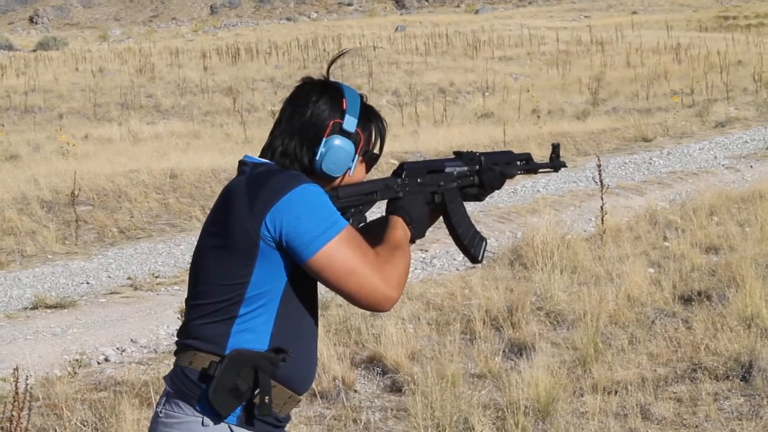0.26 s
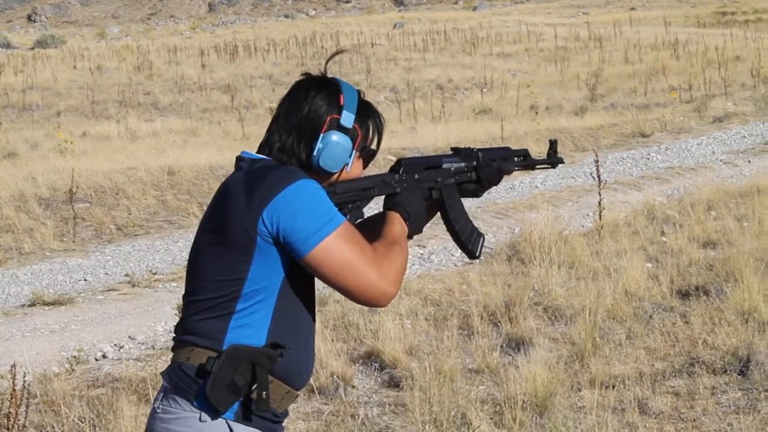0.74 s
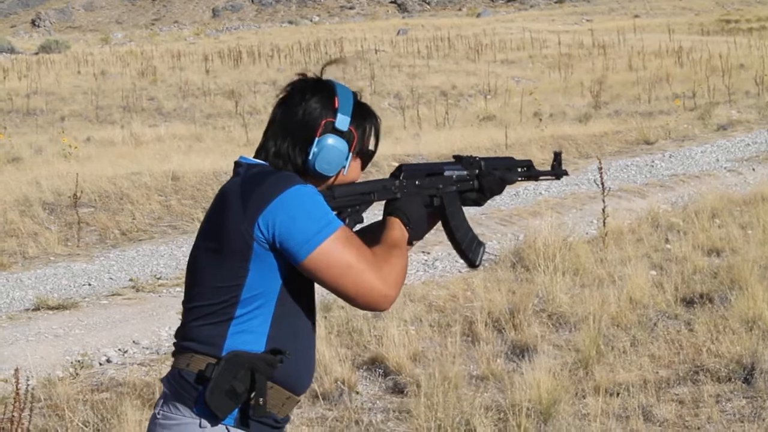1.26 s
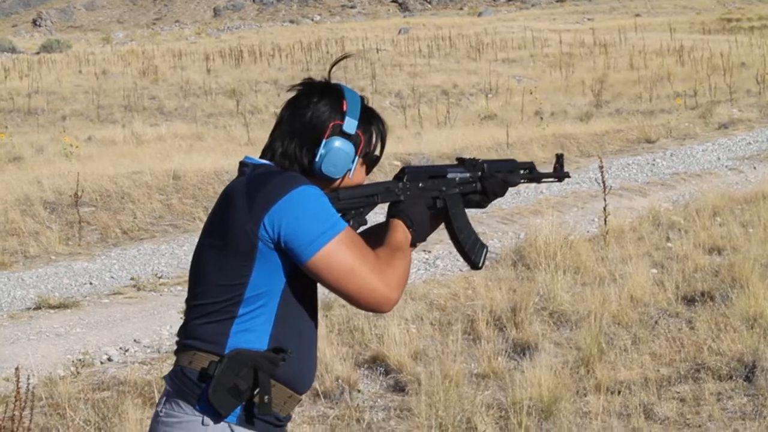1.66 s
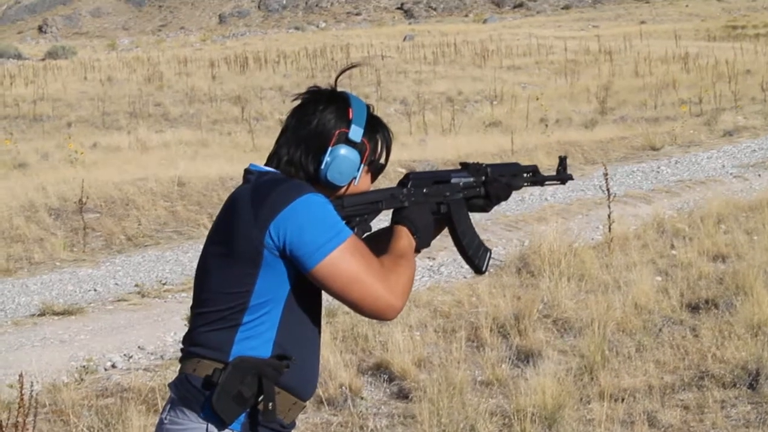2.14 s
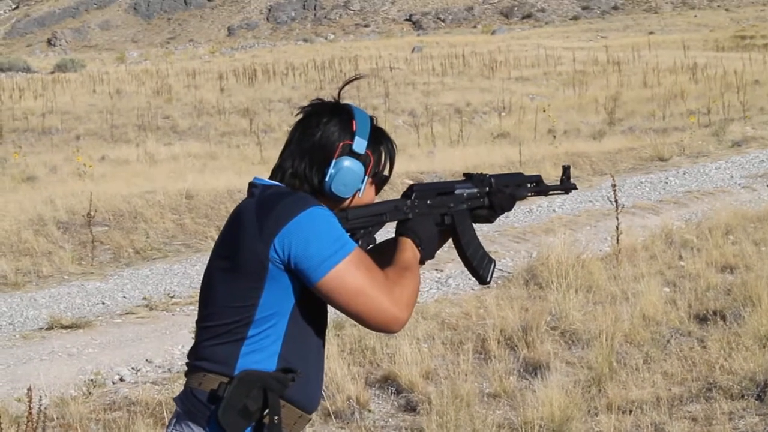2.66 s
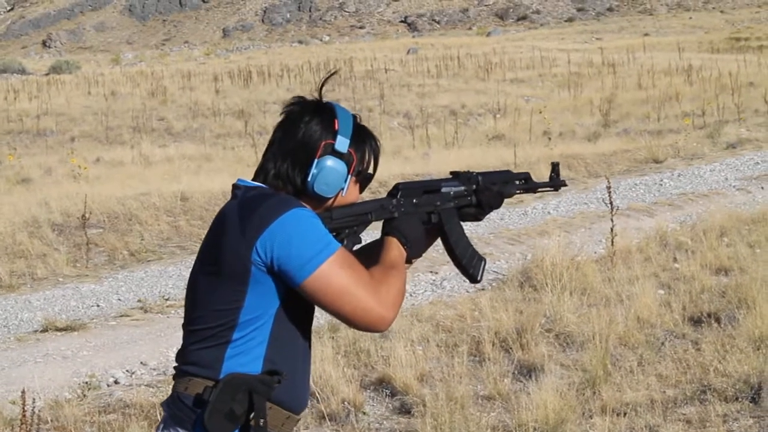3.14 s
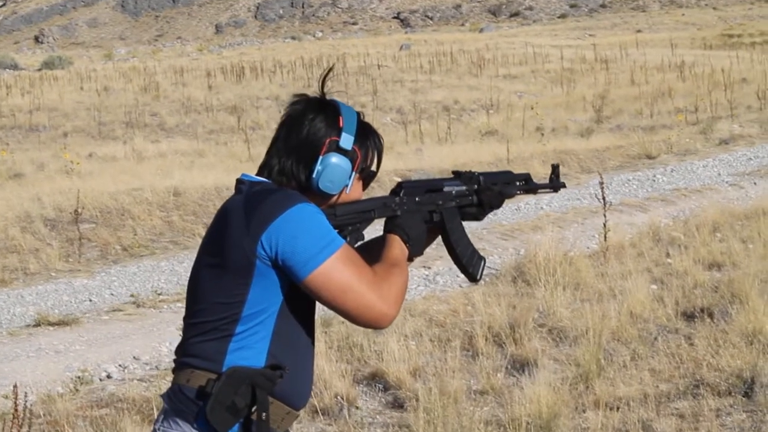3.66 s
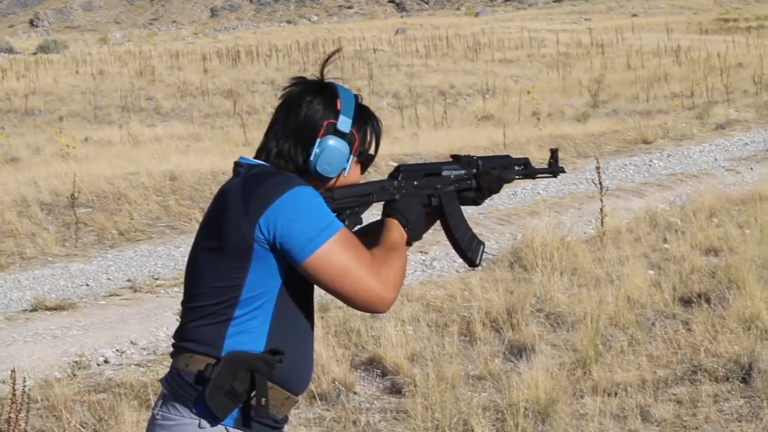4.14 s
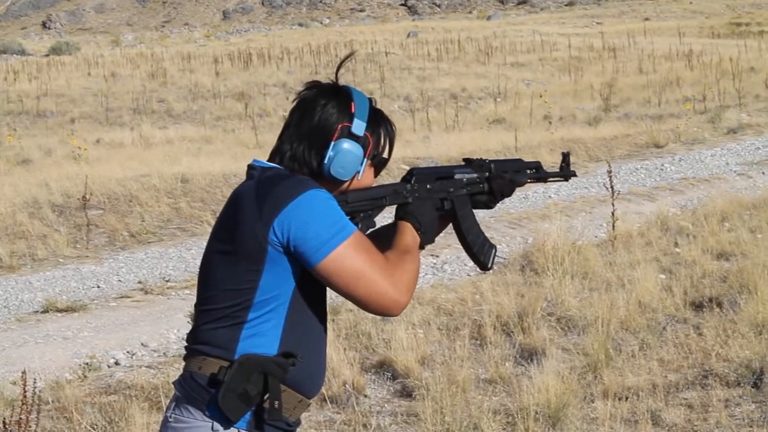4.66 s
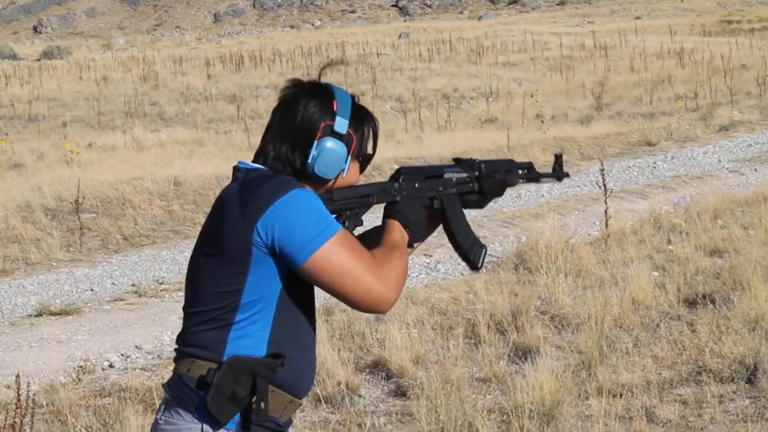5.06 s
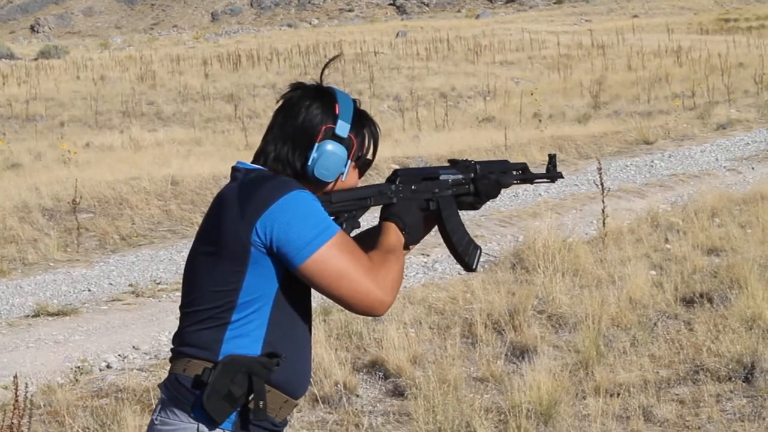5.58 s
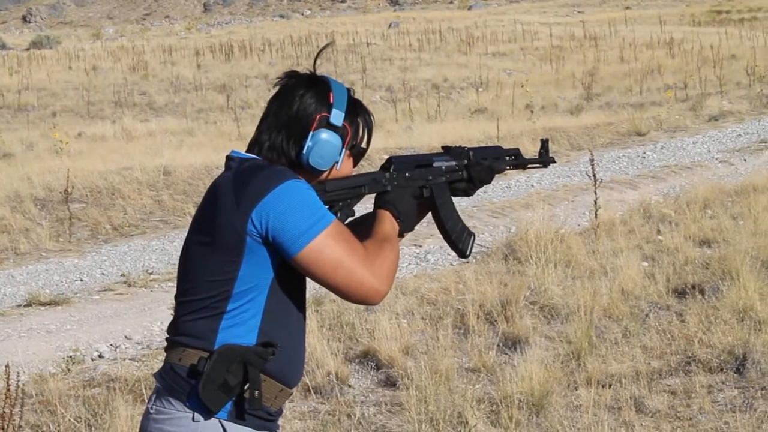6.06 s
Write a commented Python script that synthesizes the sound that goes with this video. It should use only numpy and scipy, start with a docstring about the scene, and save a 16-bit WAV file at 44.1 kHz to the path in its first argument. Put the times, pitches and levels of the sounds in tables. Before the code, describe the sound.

Three spaced rifle shots crack on an open dry hillside, echoes rolling back, with metallic case ringing, action clacks and wind thumping the microphone.

```python
"""Gear ticks and light wind thumps the microphone; then a rifle fires three single shots on a dry hillside.
Each blast is a burst of coloured noise that overloads the input and rolls back from the slopes as
fading noise and low thuds. The bolt clacks in short noise bursts; twice the thrown case tumbles past,
ringing as a sum of sines. Bullets whirr off the slope as blurred gliding partials.
Wind, rush and rustle are coloured noise; eddies are short low wavelets; ticks are rough knocks with a scratch."""
import sys
import numpy as np
from scipy import signal
from scipy.fft import rfft, irfft
from scipy.io import wavfile
from scipy.ndimage import map_coordinates

SR = 44100
rng = np.random.default_rng(int(sys.argv[2]) if len(sys.argv) > 2 else 0)


def master_out(mix):
    """Clip the mix to full scale and print it as 16-bit PCM to the path in sys.argv[1]."""
    frames = np.transpose(np.atleast_2d(mix))
    ceiling = np.clip(frames, -1, 1)
    pcm = np.round(ceiling * 32767).astype(np.int16)
    wavfile.write(sys.argv[1], SR, pcm)


def to_linear_factor(level_db):
    """Convert decibel levels (scalar or array-like) to linear amplitude factors."""
    exponent = np.asarray(level_db, float) / 20
    return 10 ** exponent


N = 278271
T = np.arange(N) / SR

# muzzle blasts: (time [s], level [dB], hold [s])
BLASTS = [(1.163, -8.5, 0.004), (2.914, -3.5, 0.003), (4.9675, -7, 0.0035)]
# colour of ticks and of the hammer: (frequency [Hz], relative density [dB per Hz])
TICK_TONE = [(180, -23), (300, -3.5), (911, -11.5), (1380, -12.5), (1770, -7.5), (4330, -15.5),
             (12000, -40.5), (15600, -68.5), (22000, -120)]
# colour of the electronics' hiss and of the clacks' crack: (frequency [Hz], relative density [dB per Hz])
HISS = [(700, -16), (1300, -3.5), (2500, 0.5), (5000, -5.5), (8000, -7), (10000, -14), (15000, -14.5),
        (15900, -22.5), (16300, -56.5)]
# air around the microphone: (time [s], buffet [dB], distant rush [dB], rustle [dB])
AIR = [(0.0, -66, -67, -69), (0.082, -68, -54, -63), (0.262, -69, -65, -69.5), (0.4, -59, -62.5, -70.5),
       (0.53, -57.5, -66, -67.5), (0.75, -56, -67.5, -67), (1.1, -79.5, -63, -67.5),
       (1.65, -46.5, -56, -62), (1.986, -46.5, -52, -59.5), (2.232, -54.5, -60, -66),
       (2.526, -43.5, -61.5, -81), (2.85, -71, -65, -73.5), (3.5, -43, -63.5, -65.5),
       (4.082, -49, -52.5, -64), (4.47, -60, -57.5, -68.5), (4.702, -55, -55, -70),
       (4.795, -38, -61.5, -79), (4.83, -40.5, -59.5, -49.5), (4.95, -53, -62.5, -60),
       (5.45, -38.5, -49, -63.5), (5.826, -51.5, -52, -62), (6.31, -80, -55.5, -64.5)]


def unit(x):
    """Scale to rms 1."""
    return x / np.sqrt(np.mean(x ** 2) + 1e-20)


def curves(rows, t=T):
    """Each column after the time, read at times t."""
    s, *cols = np.transpose(rows)
    return [np.interp(t, s, c) for c in cols]


def wobble(rate):
    """A smooth random curve, rate knots a second."""
    knots = rng.standard_normal(int(N * rate / SR) + 4)
    return map_coordinates(knots, [T * rate])


def noise(spectrum):
    """Noise of rms 1 with the given colour."""
    f, db = np.transpose(spectrum)
    hz = np.fft.rfftfreq(N, 1 / SR)
    gain = to_linear_factor(np.interp(np.log(hz + 1), np.log(f + 1), db))
    return unit(irfft(rfft(rng.standard_normal(N)) * gain, N))


def bursts(events, tone, t60):
    """Noise that starts at once, holds, then falls 60 dB per t60 seconds."""
    env = np.zeros(N)
    for s, db, hold in events:
        t = T - s
        env += (t >= 0) * to_linear_factor(db - 60 * np.clip(t - hold, 0, 1) / t60)
    return env * noise(tone)


def wavelets(events, cycles):
    """Soft pushes of a few cycles: rows of (centre [s], level [dB], pitch [Hz])."""
    s, db, hz = np.transpose(events)[:, :, None]
    at = np.clip(np.round(s * SR).astype(int) + np.arange(-1500, 1500), 0, N - 1)
    u = (at / SR - s) * hz  # cycles from the centre
    swing = np.sin(2 * np.pi * u + rng.uniform(0, 2 * np.pi, s.shape))
    push = to_linear_factor(db) * swing * np.exp(-(u / cycles) ** 2)
    return np.bincount(at.ravel(), push.ravel(), N)


def air():
    """Lumpy buffeting, a far rush, rustling grass, the electronics' hiss and a thin wavering whistle."""
    # colours: (frequency [Hz], relative density [dB per Hz])
    buffet_tone = [(12, -45), (20, 1.5), (86, -7.5), (129, -3.5), (376, -22.5), (400, -20), (520, -48),
                   (880, -120)]
    rush_tone = [(150, -2.5), (250, -9), (361, -9), (589, -0.5), (753, -5), (876, -12.5), (1130, -8.5),
                 (1400, -37), (1820, -57), (3080, -120)]
    rustle_tone = [(470, -36.5), (800, -10), (1670, -10), (3470, -37), (4000, -31.5), (5200, -65),
                   (8800, -120)]
    # whistle: pitch [Hz], level [dB]
    whistle_hz, whistle_db = (15735, -80)
    hiss_db = -67.5
    buffet_db, rush_db, rustle_db = curves(AIR)
    buffet = to_linear_factor(buffet_db) * unit(noise(buffet_tone) * to_linear_factor(4 * wobble(30)))
    rush = to_linear_factor(rush_db + 0.81 * wobble(17)) * noise(rush_tone)
    rustle = to_linear_factor(rustle_db + 0.45 * wobble(18)) * noise(rustle_tone)
    hiss = to_linear_factor(hiss_db) * noise(HISS)
    whistle = to_linear_factor(whistle_db) * np.sin(2 * np.pi * whistle_hz * T) * wobble(200)
    return buffet + rush + rustle + hiss + whistle


def thumps():
    """Each wind eddy pushes the membrane through a cycle or two."""
    # strong thumps: (time [s], level [dB], pitch [Hz])
    strong = [(0.396, -31.5, 168), (0.53, -38, 140), (0.745, -43, 130), (1.604, -31, 215),
              (2.014, -22.5, 233), (2.032, -28.5, 128), (2.475, -31, 144.3), (2.49, -32.5, 164.2),
              (2.506, -33, 141), (2.623, -34, 243.2), (3.357, -30.5, 226), (3.72, -26, 187),
              (3.81, -31.5, 210), (3.883, -29, 189.7), (3.928, -32, 262), (4.041, -21, 218),
              (4.052, -28, 230), (4.224, -32, 174.7), (4.67, -34.5, 121), (4.78, -25, 158.2),
              (4.789, -14.5, 343), (4.941, -28.5, 200.6), (5.43, -25, 248), (5.444, -42, 224.3),
              (5.536, -27.5, 188), (5.724, -29.5, 197), (5.734, -28, 166)]
    eddies, eddy_db, eddy_hz = 60, 8.5, 180  # lesser thumps at random, dB over the buffeting
    s, size, pitch = rng.uniform(0, 1, (eddies, 3)).T
    s = s * T[-1]
    small_db = curves(AIR, s)[0] + eddy_db + 6 * size
    small_hz = eddy_hz * (.75 + .55 * pitch)
    small = np.transpose([s, small_db, small_hz])
    return wavelets(np.concatenate([strong, small]), cycles=0.54)


def ticks():
    """A short rough knock at its own pitch, with a scratch on top; faint ones rattle around the strong."""
    # ticks of gear and gravel: (time [s], level [dB], pitch [Hz], scratch over the knock [dB])
    strong = [(0.03, -33.5, 2600, -5.5), (0.089, -32, 810, -9), (0.109, -38, 1340, -1),
              (0.157, -38, 807, -2.5), (0.214, -44.5, 850, -3), (0.303, -43.5, 2520, 0),
              (0.736, -36, 925, -4), (0.774, -39.5, 833, -7), (0.801, -37, 1005, -7),
              (0.866, -38, 1750, -1.5), (0.89, -43.5, 3000, 2.5), (0.949, -53, 1000, 5),
              (1.025, -45.5, 1100, 1.5), (1.112, -45.5, 1140, 1), (1.754, -39, 2590, -1.5),
              (1.953, -32.5, 1013, 2.5), (2.638, -29, 1032, -35), (3.236, -40.5, 3030, -11),
              (3.69, -28, 2390, -5), (3.719, -38, 763, -25), (3.823, -52, 1206, 5), (3.875, -43.5, 900, -6),
              (4.022, -40.5, 783, -9.5), (4.109, -41, 810, -11), (4.513, -39.5, 853, 3.5),
              (4.669, -68, 877, -13), (4.726, -48, 1800, 7), (4.787, -35, 794, -24),
              (4.895, -40.5, 2500, 7.5), (4.917, -45.5, 1260, 4.5), (5.926, -33.5, 815, -18)]
    t60_s, t60_hz = 0.047, 1000  # ring time at that pitch; higher knocks are shorter
    faint_count, faint_db, rattle_s = 20, -56, .06
    scratch, knock = np.zeros(N + SR), np.zeros(N + SR)
    t = np.arange(SR // 10) / SR
    faint = rng.uniform(0, 1, (faint_count, 4)) * [1, 5, 2500, 4.6] + [0, faint_db, 900, 0]
    # each faint tick falls near a strong one picked at random
    near = np.array(strong)[(faint[:, 0] * len(strong)).astype(int), 0]
    faint[:, 0] = np.abs(near + rattle_s * rng.standard_normal(faint_count))
    for s, db, hz, scratch_db in np.concatenate([strong, faint]):
        t60 = t60_s * t60_hz / hz
        env = (1 - np.exp(-t / 0.0036)) * to_linear_factor(db - 60 * t / t60)
        start = round(s * SR)
        add = slice(start, start + len(t))
        scratch[add] += to_linear_factor(scratch_db) * env
        knock[add] += env * np.sin(2 * np.pi * hz * t)
    scratches = scratch[:N] * noise(TICK_TONE) * to_linear_factor(2.0 * wobble(470))
    return scratches + knock[:N] * (0.21 + wobble(900))


def ricochet():
    """A glancing bullet whirrs away, tumbling unevenly, so each partial is a blurred band."""
    # glides, two after the first shot and one after the third: (time [s], pitch [Hz])
    glides = [
        [(1.33, 2650), (1.4, 2950), (1.47, 3200)],
        [(1.42, 2150), (1.55, 2300), (1.62, 2390), (1.76, 2100)],
        [(5.1, 1430), (5.22, 1230), (5.32, 1078), (5.43, 930), (5.58, 755), (5.8, 581)],
    ]
    # one row a glide: (swell [s], level [dB], fall [dB/s], overtones [dB])
    levels = [(.04, -45, 80, -30), (.07, -52, 50, -30), (.1, -36, 65, -4)]
    out = np.zeros(N)
    for rows, (swell, level_db, fall, overtone_db) in zip(glides, levels):
        pitch, t = curves(rows)[0], T - rows[0][0]
        rise = np.clip(t / swell, 0, 1) ** 3
        end = np.clip((rows[-1][0] - T) / 0.073, 0, 1)
        env = rise * to_linear_factor(level_db - fall * np.clip(t - swell, 0, 1)) * end
        for k, db in enumerate([0, overtone_db, overtone_db - 8.0, overtone_db - 10.5], 1):
            phase = 2 * np.pi * np.cumsum(k * pitch * (1 + .012 * wobble(90))) / SR
            flutter = .9 + .5 * wobble(60 + 50 * k)
            out += env * to_linear_factor(db) * flutter * np.sin(phase)
    return out


def ring(hz, db):
    """One mode of the case: a sine of the given rms level at a random phase."""
    return to_linear_factor(db) * np.sqrt(2) * np.sin(2 * np.pi * hz * T + rng.uniform(0, 2 * np.pi))


def case():
    """Tube modes of the thrown case, their levels turning with the tumble; the second throw is a little lower."""
    # throws: (time [s], first end-on moment [s], half turn [s])
    throws = [(1.242, 1.341, .173), (2.995, 3.013, .096)]
    # pitch factor of each throw, for all but the two long modes
    doppler = [1, .9968]
    # per throw, one row a group (main, mouth, high, side, long high, long low):
    # (level at the throw [dB], drift [dB/s], hold [s], then fall [dB/s], loss when end-on [dB])
    group_levels = [
        [(-21.5, -13, 0.17, 416, -1.4), (-29.5, -56.5, 0.1, 1009, 0.5), (-32, -36.5, 0.17, 306, 4),
         (-34, 27, 0.21, 702, 2.85), (-47, 94, 0.25, 175, 52), (-62, 128.5, 0.16, 139, 2)],
        [(-25, 70, .12, 403.5, 13), (-18.5, -200, 0.041, 896.5, 1.8), (-20.5, -49, .14, 369.5, 25),
         (-34.5, 7.5, 0.17, 420, 10), (-33.5, -49, 0.49, 132, 6), (-73.5, 194, 0.16, 59, 0)],
    ]
    # modes of the first four groups: pitches [Hz]
    mode_hz = [
        [4795, 6508, 9000, 9588, 10045, 11079, 11434, 12026, 12586, 13103, 14142, 15073],
        [1949, 2756, 4204],
        [8174, 7022, 10410, 13080, 14180, 15200],
        [4928, 4212, 3380],
    ]
    # per throw, levels of those modes over their group [dB]
    mode_db = [
        [[2.5, -41.5, -48.5, -38, -38.5, -46.5, -46, -31.5, -40.5, -36.5, -39, -40], [1.5, -3.5, -4], [2.5, -10,
         -53.5, -49, -50.5, -52.5], [0.5, -24.5, -28]],
        [[-0.5, -27, -45, -32, -46, -41, -45, -43.5, -49.5, -52.5, -53.5, -52], [3.5, -16, -15.5], [1.5, -11,
         -27, -26, -38, -37], [-2, -2.5, -13.5]],
    ]
    # the two longest modes: pitch in each throw [Hz]
    linger_hz = [(7792, 7811), (1275, 1276)]
    # faint lasting main ring: level at each throw [dB]
    rings_on_db = [-44, -51.5]
    rings_on_fall = 75  # dB/s
    out = np.zeros(N)
    for throw, ((s, end_on, half_turn), shift) in enumerate(zip(throws, doppler)):
        t = T - s
        side_on = np.sin(np.pi * (T - end_on) / half_turn) ** 2
        groups = [(np.multiply(hzs, shift), dbs) for hzs, dbs in zip(mode_hz, mode_db[throw])]
        groups += [([hz[throw]], [0]) for hz in linger_hz]
        lasting_db = rings_on_db[throw] - rings_on_fall * np.abs(t) + 3 * wobble(45)
        out += (t > 0) * ring(mode_hz[0][0] * shift, lasting_db)
        for (hzs, dbs), (db0, drift, hold, fall, fade_db) in zip(groups, group_levels[throw]):
            level = db0 + drift * np.clip(t, 0, hold) - fall * np.clip(t - hold, 0, 1)
            face = (t > -.003) * np.sqrt(side_on + (1 - side_on) * to_linear_factor(-2 * fade_db))
            out += face * ring(hzs[0], level + dbs[0])
            # the other modes waver and follow the tumble less
            for hz, db in zip(hzs[1:], dbs[1:]):
                waver_db = 4.0 * wobble(30) + 3.4 * wobble(150)
                out += (t > 0) * face ** 0.52 * ring(hz, level + db + waver_db)
    return out


def hill_folds():
    """Strong and lesser folds of the hill as rows of (delay [s], level [dB], pitch [Hz]); far ones answer lower."""
    # folds that answer loudest: (time after the shot [s], level over the low echo [dB])
    loudest = [(.043, 34.5), (.075, 37), (.145, 46), (.165, 37.5), (.178, 44), (.201, 35), (0.222, 41.5),
               (.242, 28), (0.266, 37), (.305, 41), (.321, 37.5), (.335, 33), (0.388, 38.5), (0.416, 31.5)]
    small_count, small_db, small_spread_s = 9, 31.5, .45
    near_hz, sag_hz_per_s, scatter = 278, 120, .05
    small = rng.uniform(0, 1, (small_count, 2)) * [small_spread_s, 4] + [.02, small_db]
    s, db = np.concatenate([loudest, small]).T
    hz = (near_hz - sag_hz_per_s * s) * (1 + scatter * rng.standard_normal(len(s)))
    return np.transpose([s, db, hz])


def echo():
    """Scattered returns; the air eats the treble as the path grows, and each fold sends back a low thud."""
    # common echo of ground and slopes, before each shot's own changes: (time after the shot [s],
    # density near 700 Hz, 250 Hz, 3.2 kHz, 5.8 kHz [dB per Hz])
    decay = [(.005, -52.5, -46, -55.5, -57), (0.01, -52.5, -58, -59, -63.5), (0.07, -48, -53.5, -69, -66.5),
             (.078, -57, -57, -68.5, -66.5), (.115, -63.5, -54.5, -72, -78),
             (0.146, -56.5, -65, -70, -74.5), (.2, -55.5, -57.5, -72.5, -76), (.33, -71.5, -62.5, -91, -92),
             (.52, -88.5, -78, -99, -107), (0.802, -97.5, -86.5, -104, -112), (1.2, -100, -95, -110, -118)]
    # how each shot comes back: (level [dB], dip of the whole echo [dB], lasting loss in the middle [dB],
    # lasting loss in the treble [dB], extra level near 3.2 kHz [dB])
    returns = [(1.7, 11.5, 7.5, 4, 2), (2.5, 9, 10.5, 5.5, 3), (1.8, -0.9, 1.1, -1.4, -2)]
    dip_at_s, dip_width_s, dull_from_s, dull_takes_s = 0.15, 0.057, .08, 0.096
    out = np.zeros(N)
    folds = hill_folds()
    for (shot, *_), (level_db, dip_db, mid_db, treble_db, upper_db) in zip(BLASTS, returns):
        hz, t, z = signal.stft(rng.standard_normal(N), SR, nperseg=256)
        t = t - shot
        whole = level_db - dip_db * np.exp(-((t - dip_at_s) / dip_width_s) ** 2)
        dull = np.clip((t - dull_from_s) / dull_takes_s, 0, 1)
        loss = np.outer([mid_db, 0, treble_db, treble_db], dull)
        mid, low, upper, high = np.array(curves(decay, t)) + whole - loss
        # the slope carries on above
        top = high + 1.6 * (high - mid) + 3.3 - 1.8 * treble_db * np.clip(t / .3, 0, 1)
        knots = [(70, low - 30), (200, low), (330, low - .3), (550, mid + 2.6), (800, mid - 2),
                 (1150, mid - 9), (1800, (mid + upper) / 2 + 1.6), (3200, upper + upper_db),
                 (5800, high), (15000, top)]
        # draw straight lines between the knots over log frequency, frame by frame
        f = np.log([k[0] for k in knots])
        db = np.array([k[1] for k in knots])
        place = np.interp(np.log(hz + 1), f, np.arange(len(f)))
        k = np.minimum(place.astype(int), len(f) - 2)
        share = (place - k)[:, None]
        shape = (1 - share) * db[k] + share * db[k + 1]
        tail = signal.istft(z * to_linear_factor(shape), SR, nperseg=256)[1][:N]
        tail = tail * np.sqrt(SR / 2) * to_linear_factor(1.7 * wobble(70))  # density per Hz to amplitude
        thuds = wavelets(folds + [shot, 0, 0], cycles=1.0)
        thuds = to_linear_factor(np.interp(T - shot, t, low)) * thuds
        live = (T > shot) * np.clip((shot + decay[-1][0] - T) / 0.053, 0, 1)
        out += live * (tail + thuds)
    return out


def shots():
    """The hammer falls, the muzzle blast follows, and the action clacks: a knock with a bright crack."""
    # bolt and ejection clacks: (time [s], knock [dB], hold [s], crack [dB])
    clacks = [(1.187, -20.5, 0.0048, -33.5), (1.2404, -3.5, 0.0016, -12), (1.257, -23, 0.0024, -30),
              (2.9439, -20.5, 0.0022, -22.5), (2.9921, -7.5, 0.0025, -21.5), (3.0088, -18, 0.0033, -20.5),
              (4.9995, -24, 0.0033, -21), (5.0455, -25.5, 0.00079, -15), (5.0575, -30, 0.0047, -21.5),
              (5.0655, -28, 0.004, -19.5), (5.1153, -20, 0.0019, -22.5)]
    # colours: (frequency [Hz], relative density [dB per Hz])
    blast_tone = [(120, -29.5), (250, 7.5), (750, 4.5), (2000, -7), (4500, 2.5), (8000, -7), (12000, -9.5),
                  (16000, -18.5), (17500, -60)]
    clack_tone = [(180, -39.5), (300, -17), (1660, 6), (2240, 6.5), (3410, -17.5), (4770, 1),
                  (15200, -23.5), (16500, -40.5)]
    hammer = bursts([(s - .008, -36, .006) for s, *_ in BLASTS], TICK_TONE, t60=.01)
    blast = bursts(BLASTS, blast_tone, t60=.006)
    knock = bursts([(s, db, hold) for s, db, hold, _ in clacks], clack_tone, t60=0.0028)
    crack = bursts([(s, db, hold) for s, _, hold, db in clacks], HISS, t60=0.0075)
    return hammer + blast + knock + crack


def scene():
    """All sources at one microphone."""
    background = air() + thumps() + ticks()
    return (background + ricochet() + case() + echo() + shots())[None]


def low_pass(x):
    """Removes everything above the highest recorded frequency."""
    return signal.sosfilt(signal.butter(12, 16970, fs=SR, output="sos"), x)


def record(dry):
    """The microphone loses deep bass and the top; the input stage softly clips the blasts."""
    bass_cut = signal.butter(2, 55, "high", fs=SR, output="sos")
    top_cut = signal.ellip(8, .5, 60, 15950, fs=SR, output="sos")
    heard = signal.sosfilt(top_cut, signal.sosfilt(bass_cut, dry))
    clipped = heard / (1 + np.abs(heard / .6) ** 8) ** (1 / 8)  # never beyond 0.6
    return low_pass(clipped)


dry = scene()
out = record(dry)
master_out(out)
```